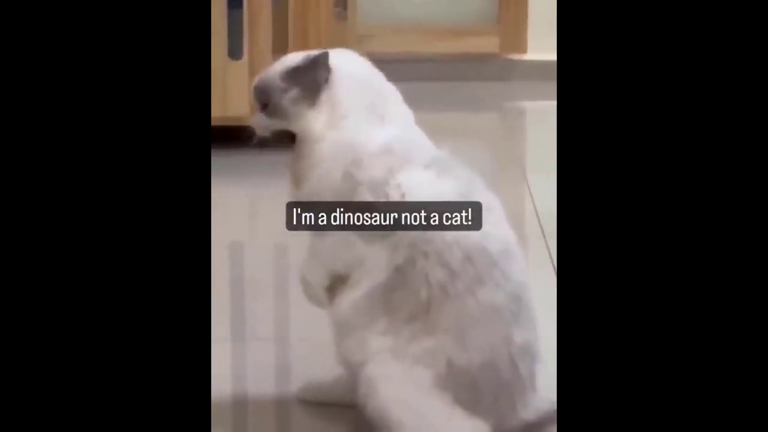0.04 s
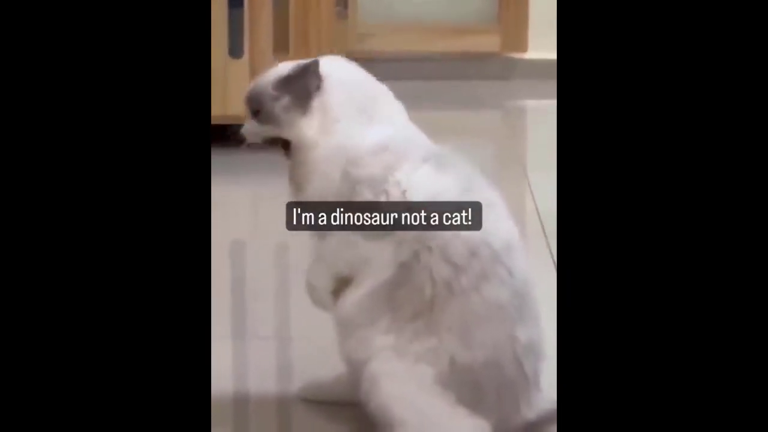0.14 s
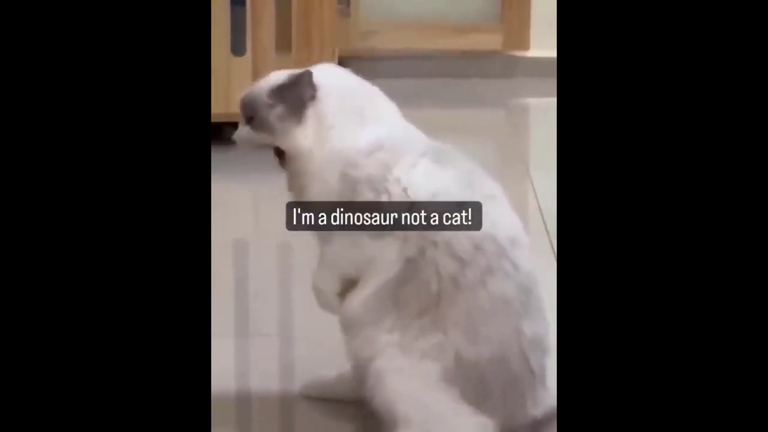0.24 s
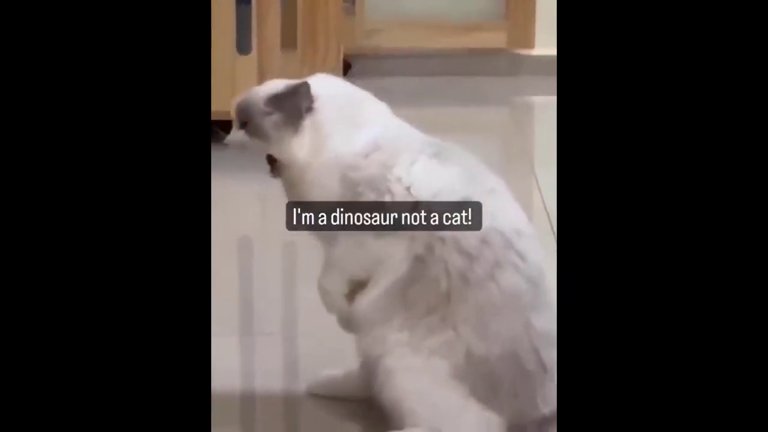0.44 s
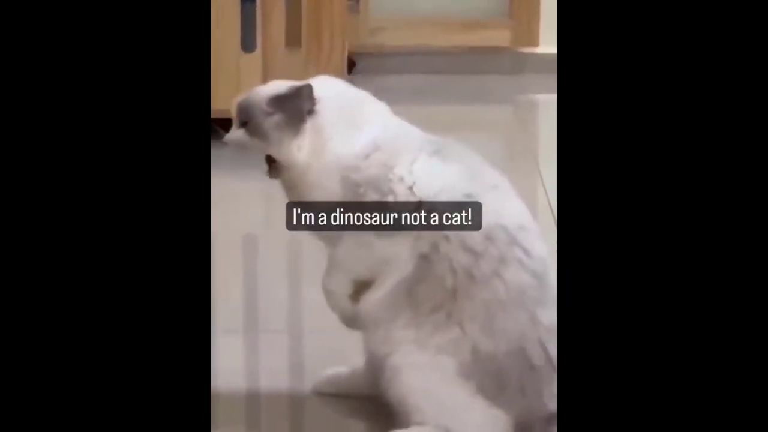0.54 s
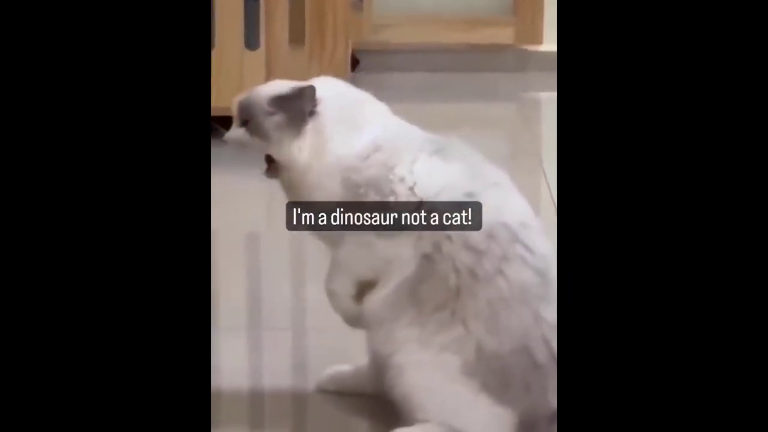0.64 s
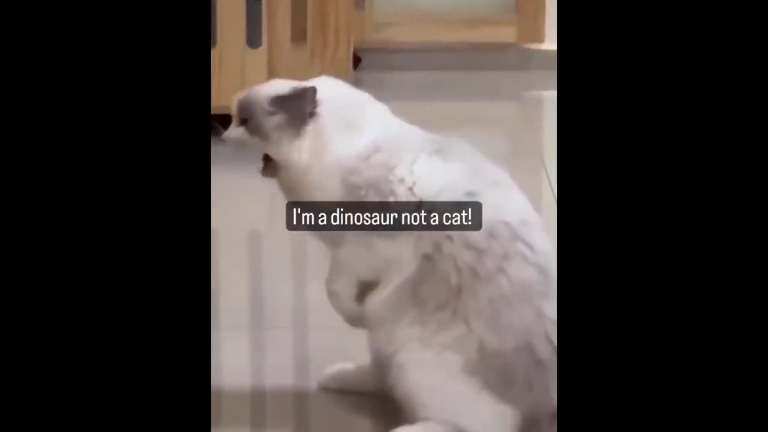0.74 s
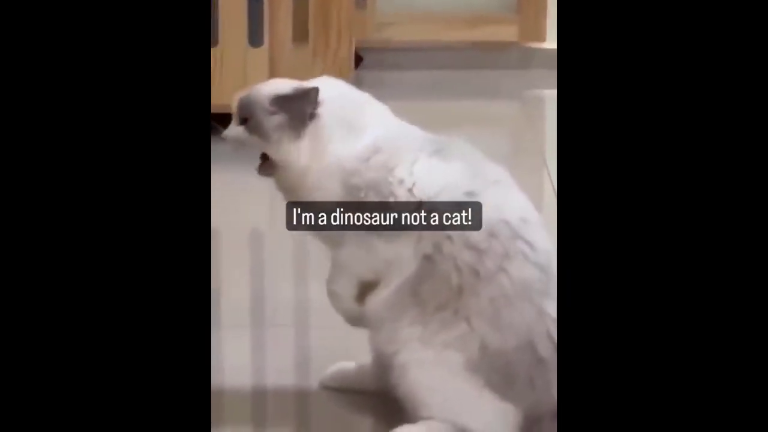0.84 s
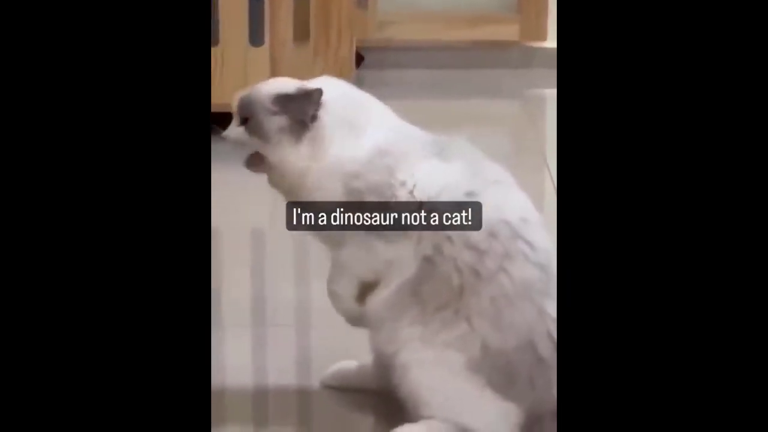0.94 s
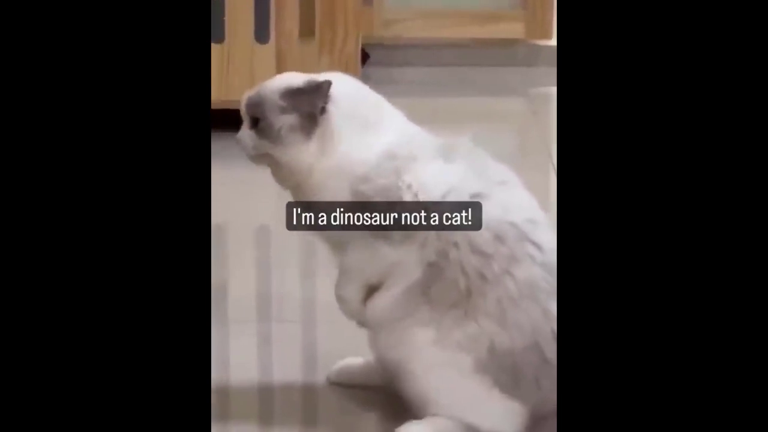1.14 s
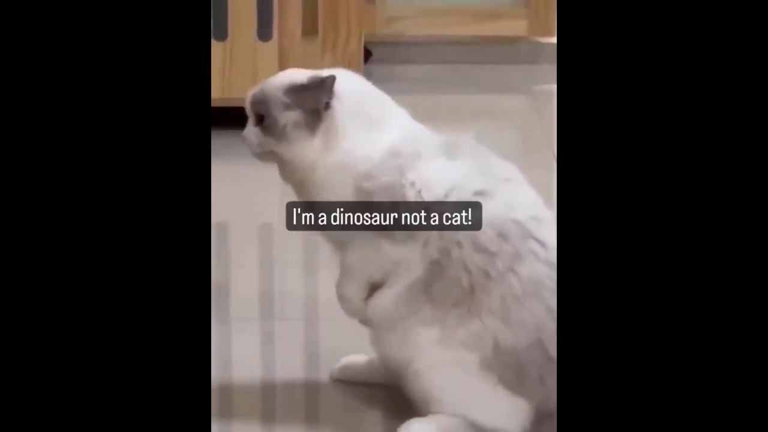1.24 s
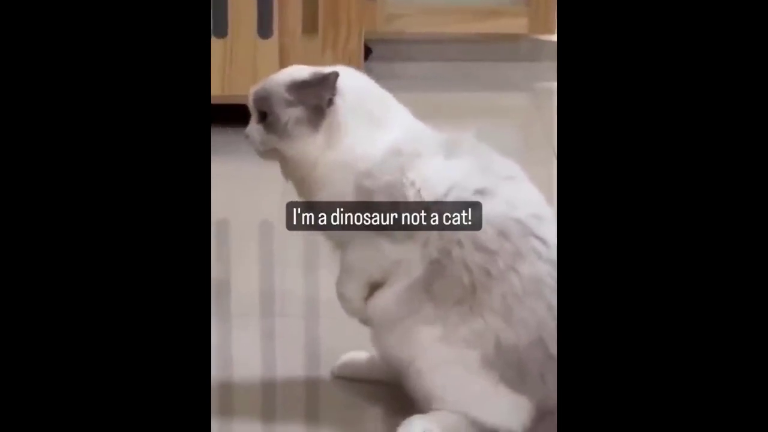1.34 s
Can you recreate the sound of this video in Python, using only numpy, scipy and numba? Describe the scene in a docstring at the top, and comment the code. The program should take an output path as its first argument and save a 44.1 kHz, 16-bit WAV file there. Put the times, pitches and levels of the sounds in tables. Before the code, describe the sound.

One cat gives a single long, loud yowl that starts quietly, climbs in pitch, turns rough in the middle and falls at the end, in a reverberant tiled room, picked up by a slightly overloaded phone microphone.

```python
"""A faint low noise and a mains hum run throughout; the noise rises under the loud part of the call.
A cat yowls once in a hard-floored room: its vocal folds send out pulses mixed with breath, and the pulses
fall into a strong-weak pattern mid-call. Moving resonances of throat and opening mouth shape the sound.
Near reflections and a dense tail ring on after it, and a phone microphone dulls and flattens the result."""
import sys
import numpy as np
from scipy import signal
from scipy.fft import rfft, irfft
from scipy.io import wavfile
from scipy.ndimage import uniform_filter1d
from numba import njit

SR = 44100
rng = np.random.default_rng(int(sys.argv[2]) if len(sys.argv) > 2 else 0)


def nominal_scale(level):
    """Amplitude ratio for a level in decibels (scalar or array-like)."""
    x = np.asarray(level, float) / 20
    return 10 ** x


def dump(signal):
    """Clip the signal to [-1, 1] and save it as 16-bit WAV at the path in sys.argv[1]."""
    limited = np.clip(np.atleast_2d(signal).T, -1, 1)
    pcm = np.round(limited * 32767).astype(np.int16)
    wavfile.write(sys.argv[1], SR, pcm)


N = 61739  # length in samples


def curve(table, axis=1):
    """One column of a table, drawn as straight lines over time: a value per sample."""
    rows = np.array(table, float)
    return np.interp(np.arange(N) / SR, rows[:, 0], rows[:, axis])


def unit(x):
    """Scale to rms 1."""
    return x / np.sqrt(np.mean(x ** 2))


def wobble(hz):
    """Smooth random motion of rms 1: noise averaged twice over 1/hz seconds."""
    k = max(int(SR / hz), 2)
    once = uniform_filter1d(rng.standard_normal(N), k)
    return unit(uniform_filter1d(once, k))


@njit
def moving_resonance(x, hz, width):
    """State-variable band-pass whose centre and width can move; gain 1 at the centre."""
    y, band, low = np.empty(len(x)), 0., 0.
    for i in range(len(x)):
        g, k = np.tan(np.pi * hz[i] / SR), width[i] / hz[i]
        v = (band + g * (x[i] - low)) / (1 + g * (g + k))
        band, low, y[i] = 2 * v - band, low + 2 * g * v, k * v
    return y


def steep(x, hz, width_hz):
    """A resonance applied twice, so that it falls off faster on both sides."""
    hz, width_hz = hz + np.zeros(N), width_hz + np.zeros(N)
    once = moving_resonance(x, hz, width_hz)
    return moving_resonance(once, hz, width_hz)


def tract(src, table, widths_hz):
    """Sum of moving resonances; neighbours have opposite sign."""
    total = np.zeros(N)
    for j, width_hz in enumerate(widths_hz):
        centre_hz, gain = curve(table, axis=2 * j + 1), nominal_scale(curve(table, axis=2 * j + 2))
        total += (-1) ** j * gain * steep(src, centre_hz, width_hz)
    return total


def low_noise():
    """Noise, mostly low, with a fixed spectrum; it rises under the loud part of the call."""
    # Spectrum of the noise. Each row: frequency in Hz, relative level in dB per Hz.
    spectrum = [(20, -15.5), (45, -2.5), (100, -7), (200, -11), (320, -12.5), (500, -12.5), (900, -21.5),
                (2000, -15.5), (5000, -40), (10000, -81.5)]
    # Rise under the loud part of the call. Each row: time in seconds, change of level in dB.
    rise_under_call = [(0, -3.5), (.25, -1), (.45, 3), (.6, 7), (.7, 10), (.78, 0.5), (1.4, -5)]
    f, points = np.fft.rfftfreq(N, 1 / SR) + 1, np.array(spectrum)
    gain = nominal_scale(np.interp(np.log(f), np.log(points[:, 0]), points[:, 1]))
    noise = irfft(rfft(rng.standard_normal(N)) * gain, N)
    return unit(noise) * nominal_scale(-67 + curve(rise_under_call))


def mains_hum():
    """A 100 Hz sine whose level, around -79 dB, wanders a little."""
    return np.sin(2 * np.pi * 100 * np.arange(N) / SR) * nominal_scale(-79 + 3 * wobble(6))


def room(x):
    """Direct sound, quick near reflections and a dense tail that dies band by band."""
    # Echo by band. Each row: centre in Hz, time to fall by 60 dB in seconds,
    # level of the echo against the direct sound in dB.
    bands = [(352, 0.63, -15), (700, 0.54, -1.5), (1200, 0.67, -2.5), (2000, 0.64, -5), (3000, 0.72, -5),
             (3600, 0.65, -7.5), (4300, 0.67, -5), (4630, 0.55, -3.5), (6000, 0.72, -6), (9320, 0.44, 5)]
    gap_s, rise_s = 0.0014, 0.0039  # silence before the echo, then its build-up
    early_t60_s, early_db = .1, -3  # floor and furniture close by
    t, f = np.arange(N) / SR, np.log(np.fft.rfftfreq(N, 1 / SR) + 1)
    noise = rfft(rng.standard_normal(N))
    centres = np.log([row[0] for row in bands])
    rise = np.clip((t - gap_s) / rise_s, 0, 1)

    def fade(t60):
        return unit(rise * nominal_scale(-60 * t / t60)) / np.sqrt(N)  # total energy 1

    tail = rng.standard_normal(N) * fade(early_t60_s) * nominal_scale(early_db)
    for (_, t60, echo_db), one in zip(bands, np.eye(len(bands))):
        # each band blends into its neighbours
        band_noise = irfft(noise * np.interp(f, centres, one), N)
        tail = tail + band_noise * fade(t60) * nominal_scale(echo_db)
    return x + signal.fftconvolve(x, tail)[:N]


def folds():
    """Vocal folds: partials of half the fold rate, the odd ones making pulses alternate; plus pulsing breath."""
    # Pitch of the call. Each row: time in seconds, fold rate in Hz.
    pitch = [(.02, 697.5), (.045, 535.6), (.065, 470.4), (.085, 427.3), (.15, 439.5), (.18, 475.3),
             (.204, 516.4), (.274, 571.5), (.33, 606.6), (.372, 635.1), (.446, 642.4), (.498, 677.8),
             (.512, 698.7), (.548, 689.4), (.566, 715.3), (.612, 725.3), (.626, 758.1), (.692, 780.2),
             (.752, 774), (.766, 784.3), (.81, 782.3), (.834, 744), (.85, 728.2), (.928, 700),
             (.958, 674.2), (1.0, 624), (1.03, 596.7), (1.06, 518.6), (1.09, 440), (1.11, 421)]
    # Unsteadiness. Each row: time in seconds, random change of the fold rate as a share of it.
    jitter = [(0, .035), (.06, .02), (.09, .005), (.2, .004), (.46, .004), (.5, .006), (.56, .003),
              (.63, .007), (.68, .004), (.75, .002), (.95, .002), (1.12, .006)]
    # Voice quality. Each row: time in seconds, strong-weak alternation in dB, relative breath level in dB.
    quality = [(0, -32, -20), (.08, -52.5, -24.5), (.2, -62, -23), (.33, -33, -36), (.36, -28, -28.5),
               (.4, 5.5, -39.5), (.47, 8, -42), (.5, 3.5, -27), (.56, 8.5, -33.5), (.63, 7, -5),
               (.68, 6, -34.5), (.74, 1, -48), (.79, -51.5, -56), (.83, -51, -41.5), (1.12, -42.5, -2)]
    smooth_pitch = uniform_filter1d(curve(pitch), int(.01 * SR))  # corners rounded over 10 ms
    half_hz = smooth_pitch / 2 * (1 + curve(jitter) * wobble(330))
    phase = 2 * np.pi * np.cumsum(half_hz) / SR
    k = np.arange(1, 61)[:, None]  # partial numbers
    below_12khz = np.clip((12000 - k * half_hz) / 500, 0, 1)
    waves = np.cos(k * phase) * below_12khz * np.sqrt(half_hz / 400)
    even, odd = waves[1::2].sum(axis=0), waves[::2].sum(axis=0)
    pulses = even + nominal_scale(curve(quality)) * odd
    puffs = 1 + np.cos(2 * phase)  # breath comes once per fold cycle
    breath = rng.standard_normal(N) * puffs * 5 * nominal_scale(curve(quality, axis=2))
    shimmer = nominal_scale(.7 * wobble(150))  # quick small changes of loudness, in dB
    return pulses * shimmer, breath


def throat_and_chest(pulses):
    """Low resonances: throat and nose move with the call, the chest stays fixed."""
    # Each row: time in seconds, throat resonance in Hz, its level in dB,
    # nasal resonance in Hz, its level in dB.
    throat = [(0, 490, -6, 1026, -10), (.15, 480, -8.5, 900, -13.5), (0.299, 605, -30, 1200, -16.5),
              (0.499, 648.2, -23, 1334, -13), (.62, 750, -18, 1443, -15), (.74, 760, -35, 1520, -18),
              (0.798, 736, -17.5, 1664, -12), (0.899, 750, -19.5, 1383, -17),
              (0.999, 600, -17.5, 1287, -33), (1.12, 520, -5, 976, 2)]
    # Width in Hz of the throat and the nasal resonance, for each of two passes.
    throat_widths = (267, 460)
    # Chest resonance: centre in Hz, width of each pass in Hz, level in dB.
    chest_hz, chest_width_hz, chest_db = (340, 96, -36)
    chest = nominal_scale(chest_db) * steep(pulses, chest_hz, chest_width_hz)
    return tract(pulses, throat, throat_widths) + chest


def mouth(voice):
    """Three moving resonances of the mouth, whose widths change as it opens."""
    # Each row: time in seconds, low resonance in Hz, its level in dB,
    # middle resonance in Hz, its level in dB, high resonance in Hz, its level in dB.
    resonances = [(0, 1530, 4.5, 2480, -15, 3200, -46), (.08, 1360, -0.5, 2480, -40.5, 3060, -2),
                  (.1, 1600, 13.5, 3160, -8, 3450, -17), (.15, 1630, 8, 2200, -11.5, 3260, -1),
                  (0.182, 1670, -6, 2280, -1, 3400, -23), (.21, 1850, -1, 2790, -1, 3940, -8.5),
                  (.28, 1680, -17, 2820, 3.5, 4145, -14.5), (.35, 2020, -10, 2896, 1, 4050, 0),
                  (.4, 2065, -7.5, 2876, 0.5, 3700, -4), (.46, 2250, -14.5, 3190, -4, 4016, 4.5),
                  (.52, 2350, -11, 3300, 2.5, 4100, -0.5), (.58, 2286, -5.5, 3270, -11, 4300, 8),
                  (.64, 2484, -6.5, 3560, -10, 4185, -9), (.71, 2685, -8.5, 3590, -6, 4150, 7),
                  (.79, 1980, 4, 3000, -0.5, 3853, 6), (.85, 2080, 2.5, 3186, 0, 3590, 0.5),
                  (.92, 2320, 4, 2660, -8, 3550, 2.5), (1.0, 1856, 1, 2573, -6, 3600, -3),
                  (1.12, 1752, 4, 2071, -12, 3644, -40)]
    # Widths in Hz of the three resonances with the mouth open, for each of two passes.
    open_widths = (746, 820, 473)
    # Each row: time in seconds, widths as a share of their open value.
    opening = [(0, .8), (.09, .45), (.16, .5), (.24, 1.0), (1.12, 1.0)]
    return tract(voice, resonances, [w * curve(opening) for w in open_widths])


def upper_and_head(pulses, noise):
    """Two moving upper resonances and the fixed ones of the head, with added hiss in both."""
    # Each row: time in seconds, level of added treble hiss in dB.
    added_hiss = [(0, 20), (.15, 22), (.35, 20), (.55, 16), (.66, 14), (.72, 10), (.9, 12), (1.0, 20),
                  (1.12, 20)]
    # Each row: time in seconds, first upper resonance in Hz, its level in dB,
    # second upper resonance in Hz, its level in dB.
    upper = [(0, 4500, -42, 6000, -49), (.15, 4320, -32.5, 6000, -32.5), (.25, 4520, -18.5, 6370, -37),
             (.33, 4590, -3.5, 6000, -20), (0.461, 4546, -1.5, 5900, -17), (0.549, 5140, -6, 6060, -13),
             (.63, 4860, -31.5, 5740, -17), (.72, 4730, -21.5, 5280, -6), (.8, 4860, -8.5, 6200, -14),
             (.9, 4300, -6.5, 5520, -13.5), (0.999, 4088, -21, 5520, -33.5), (1.12, 4080, -32.5, 5500, -34)]
    # Widths in Hz of the two upper resonances, for each of two passes.
    upper_widths = (306, 940)
    # Head resonances. Each row: centre in Hz, width of each pass in Hz, level before the treble curve in dB.
    head_rows = [(7500, 1800, -22), (10000, 1200, -24)]
    # Each row: time in seconds, level of the head resonances in dB.
    treble = [(0, -13), (.15, -18), (.25, -12.5), (.35, -4.5), (.5, -10), (.62, -6.5), (.72, 3),
              (.85, -50.5), (1.0, -8), (1.12, -58)]
    hissy = pulses + noise * nominal_scale(curve(added_hiss))
    head = np.zeros(N)
    for j, (centre_hz, width_hz, head_db) in enumerate(head_rows):
        head += (-1) ** j * nominal_scale(head_db) * steep(hissy, centre_hz, width_hz)
    return tract(hissy, upper, upper_widths) + nominal_scale(curve(treble)) * head


def cat():
    """Fold pulses and noise through chest, throat, mouth and head, at the level of the effort."""
    # Effort of the call. Each row: time in seconds, relative level in dB.
    effort = [(0, -92), (.025, -53), (.08, -48), (.11, -44.5), (.125, -44), (.14, -36.5), (.175, -33.5),
              (.27, -22), (.36, -22), (.45, -25.5), (.51, -27), (.57, -25), (.62, -20.5), (.67, -21.5),
              (.77, -20), (.83, -21), (.9, -21.5), (.99, -20.5), (1.06, -28.5), (1.1, -41.5), (1.13, -101)]
    pulses, breath = folds()
    low_and_mouth = throat_and_chest(pulses) + mouth(pulses + breath)
    out = low_and_mouth - upper_and_head(pulses, breath)
    return out * nominal_scale(curve(effort)) / 2


def scene():
    """The yowl in the room over low noise and mains hum, the same in both channels."""
    mono = low_noise() + mains_hum() + room(cat())
    return np.array([mono, mono])


def low_pass(x, hz):
    """Steep cut above hz, run forwards and backwards so that nothing is delayed."""
    return signal.sosfiltfilt(signal.ellip(6, .2, 50, hz, fs=SR, output="sos"), x)


def roll_off(x):
    """The treble ends steeply here."""
    return signal.sosfilt(signal.butter(12, 15560, fs=SR, output="sos"), x)


def record(dry):
    """The phone bends loud sound unevenly, drops the top treble in two steps and flattens the highest peaks."""
    bent = dry + .1 * dry ** 2  # lopsided: the two halves of a wave differ
    x = signal.sosfilt(signal.butter(2, 30, "high", fs=SR, output="sos"), bent)
    x = low_pass(x, 10310)
    below = low_pass(x, 8900)
    x = below + nominal_scale(-12) * (x - below)  # what lies above 8900 Hz is 12 dB weaker
    overload, hardness = .54, 5  # highest possible peak, sharpness of the bend towards it
    x = x / (1 + np.abs(x / overload) ** hardness) ** (1 / hardness)
    return roll_off(x)


dry = scene()
out = record(dry)
dump(out)
```